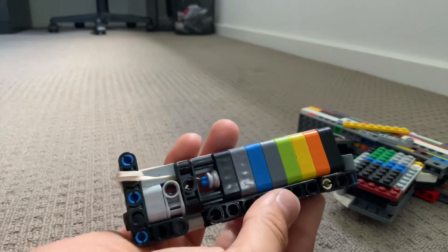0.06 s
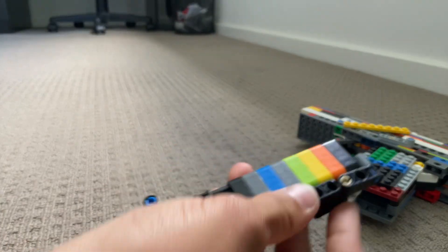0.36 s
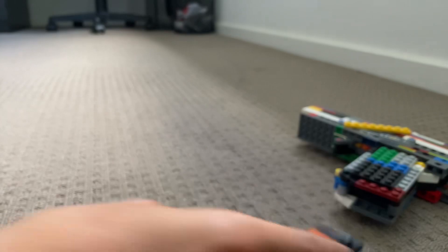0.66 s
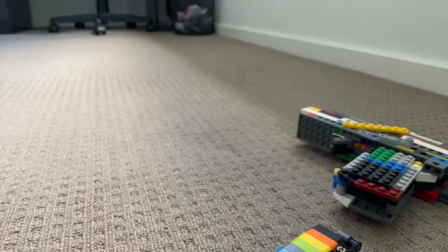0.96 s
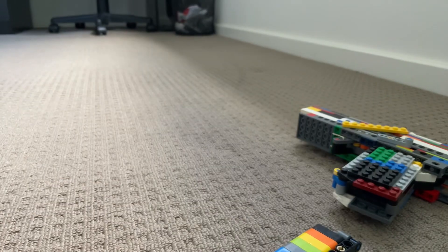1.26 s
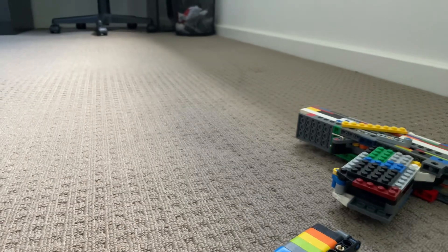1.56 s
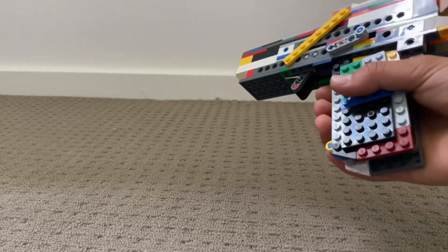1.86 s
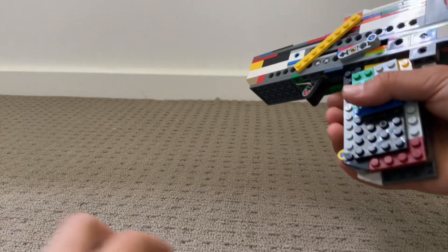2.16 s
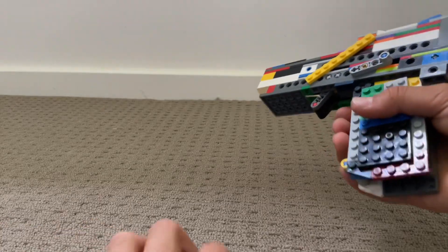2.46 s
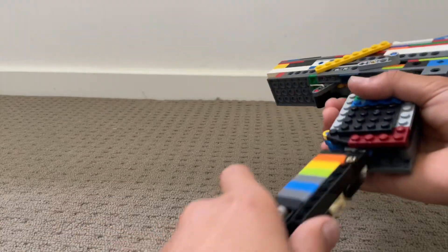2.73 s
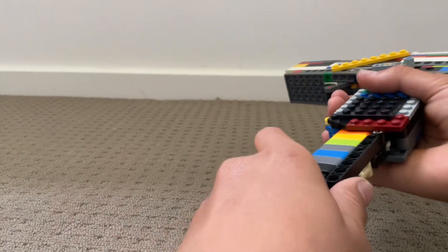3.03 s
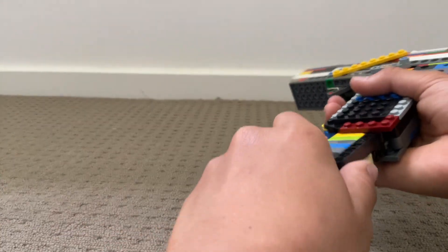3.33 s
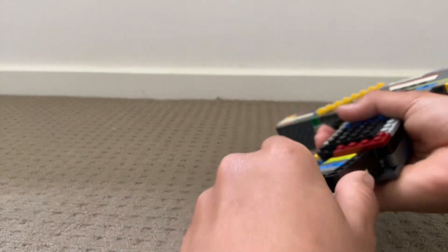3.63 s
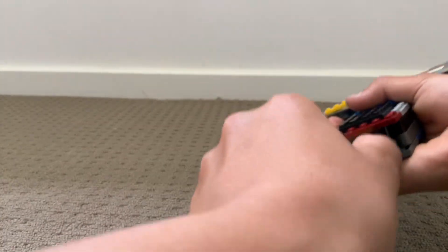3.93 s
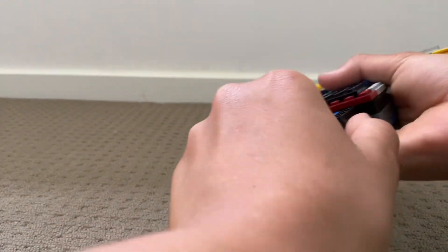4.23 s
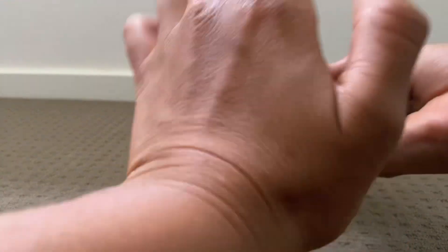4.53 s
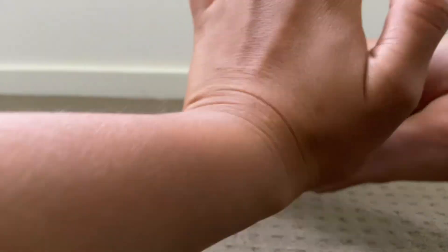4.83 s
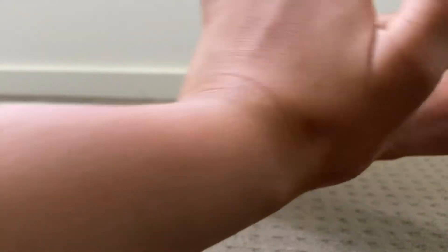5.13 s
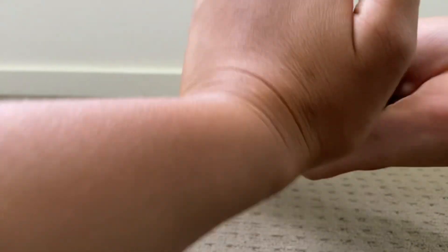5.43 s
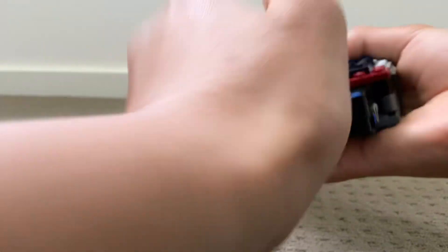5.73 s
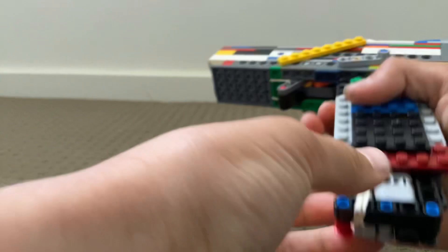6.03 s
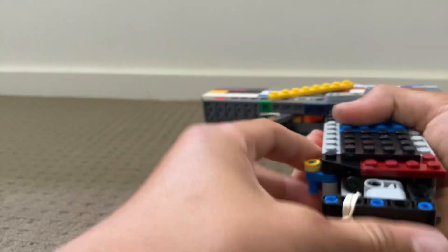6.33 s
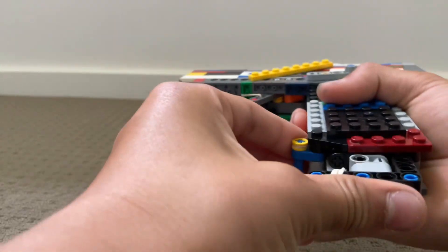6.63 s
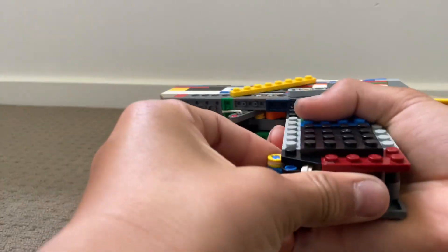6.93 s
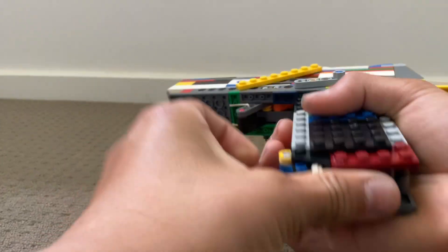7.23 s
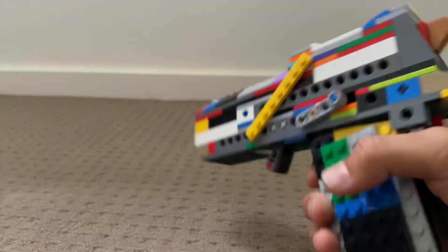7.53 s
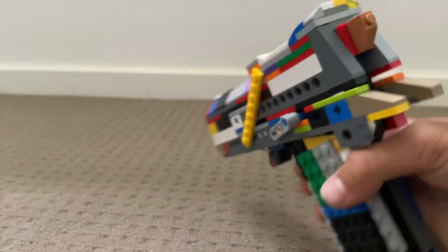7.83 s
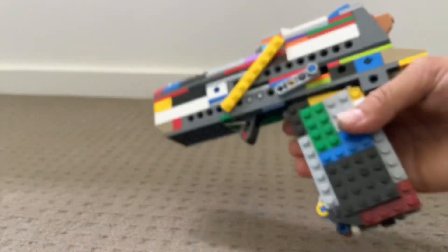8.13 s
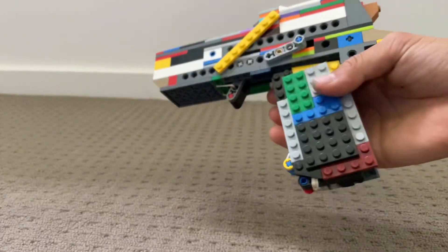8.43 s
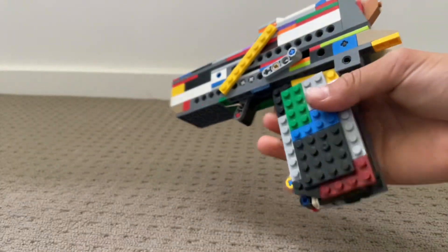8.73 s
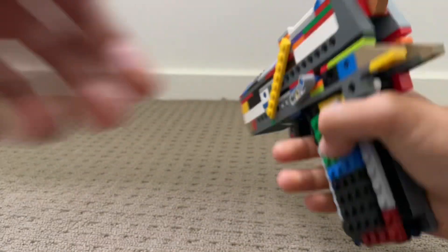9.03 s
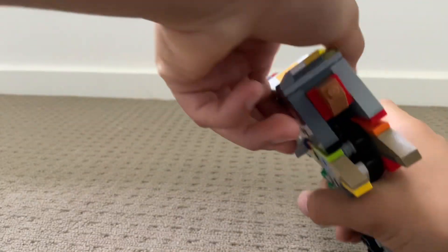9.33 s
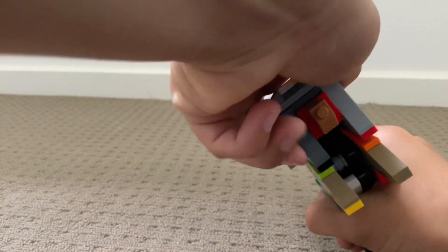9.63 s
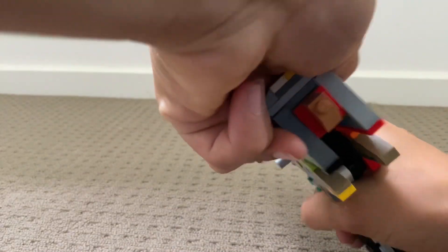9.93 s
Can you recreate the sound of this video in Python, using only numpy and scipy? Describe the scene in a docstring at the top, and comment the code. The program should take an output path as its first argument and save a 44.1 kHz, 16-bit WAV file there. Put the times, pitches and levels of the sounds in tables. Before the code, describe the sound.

A plastic piece clatters onto the floor, then hands push it into a brick toy gun with rattling clicks and a sharp snap.

```python
"""Faint, far chirps sound in a small, still room, then the magazine of a plastic-brick toy gun hits the floor.
Close by, just above the carpet, a hand picks it up, pushes it into the grip in rattling jerks and
snaps it home; then the slide is worked. Loose bricks click throughout, each a bright tick plus a
ring of the hollow toy. Studs scrape, joints creak and the floor knocks and thuds, while skin and
sleeves brush over plastic and carpet with a soft hiss."""
import sys
import numpy as np
from scipy import signal
from scipy.fft import rfft, irfft, next_fast_len
from scipy.io import wavfile

SR = 44100
rng = np.random.default_rng(int(sys.argv[2]) if len(sys.argv) > 2 else 0)


def transcribe(signal):
    """Save signal, clipped to [-1, 1], as a 16-bit WAV file at the path in sys.argv[1]."""
    frames = np.atleast_2d(signal).T
    limited = np.clip(frames, -1, 1)
    pcm = np.round(limited * 32767).astype(np.int16)
    wavfile.write(sys.argv[1], SR, pcm)


N = 439677
TIME = np.arange(N) / SR


def from_db(db):
    """Turn decibels into a number to multiply a sound by."""
    return np.exp(np.asarray(db) * (np.log(10) / 20))


def rms_one(x):
    """Scale a sound so that its average size (rms) is 1."""
    return x / np.sqrt(np.mean(x ** 2) + 1e-20)


def add(out, s, sound):
    """Mix a sound in at s seconds."""
    i = int(np.clip(s * SR, 0, N - 1))
    out[i:i + len(sound)] += sound[:N - i]


def band(x, low_hz, high_hz, order=2):
    """Keep the part of a sound between two frequencies."""
    edges = np.clip([low_hz, high_hz], 15, .47 * SR)
    return signal.sosfilt(signal.butter(order, edges, "band", fs=SR, output="sos"), x)


def coloured(x, spectrum):
    """Shape the lows and highs of a sound with a table of f/Hz, level/dB; the result has rms 1."""
    hz, db = np.transpose(spectrum)
    size = next_fast_len(N)
    bin_hz = np.maximum(np.arange(size // 2 + 1) * SR / size, 1)
    gain = from_db(np.interp(np.log(bin_hz), np.log(hz), db))
    return rms_one(irfft(rfft(x, size) * gain, size)[:N])


def dying(t, t60):
    """A fade that loses 60 dB every t60 seconds."""
    return from_db(-60 * t / t60)


def flutter(per_s):
    """A random wobble of rms 1 that glides to per_s new values a second."""
    knots = rng.standard_normal(int(per_s * N / SR) + 2)
    return rms_one(np.interp(TIME * per_s, np.arange(len(knots)), knots))


def swells(rows, width):
    """Bands of noise that fade in and out; width is a share of each band's centre frequency."""
    out = np.zeros(N)
    for start, end, db, hz in rows:
        count = max(int((end - start) * SR), 64)
        noise = band(rng.standard_normal(SR), hz * (1 - width / 2), hz * (1 + width / 2))[:count]
        add(out, start, from_db(db) * rms_one(noise) * signal.windows.tukey(len(noise), .5))
    return out


# the tone of still air: f/Hz, level/dB
AIR_COLOUR = [(29, -19.5), (50, -2.5), (277, -4.5), (572, -17.5), (765, -26), (863, -20), (1210, -21.5),
              (1580, -27.5), (2210, -25.5), (2490, -31.5), (3500, -35), (5810, -38), (6390, -32.5),
              (9870, -20.5), (16000, -35.5)]
def room_tone(air_db=-61, drone_db=-67, drone_band_hz=(265, 335), waver_db=3.1):
    """Still air, with a low room resonance that wavers a little."""
    drone = rms_one(band(rng.standard_normal(N), *drone_band_hz, order=1))
    air = from_db(air_db) * coloured(rng.standard_normal(N), AIR_COLOUR)
    return air + from_db(drone_db + waver_db * flutter(6.7)) * drone


# spells of humming: start t/s, end t/s, level/dB, centre f/Hz
HUMS = [(.83, 1.03, -55.5, 687), (1.12, 1.72, -58, 646)]
def hum():
    """A faint, hollow hum: noise so narrow that it sounds like a wavering note."""
    return swells(HUMS, width=.14)


# faint, far chirps: start t/s, first f/Hz, last f/Hz, level/dB
FAR_CHIRPS = [(.05, 2920, 2830, -56.5), (.094, 2680, 2200, -45.5), (1.29, 2520, 2340, -63)]
def chirps(attack_s=.0087, fall_s=.022, t60=.28):
    """Thin whistles that drop quickly in pitch, settle and fade."""
    out, t = np.zeros(N), TIME[:SR // 3]
    for s, first_hz, last_hz, db in FAR_CHIRPS:
        hz = last_hz + (first_hz - last_hz) * np.exp(-t / fall_s)
        level = from_db(db) * (1 - np.exp(-t / attack_s)) * dying(t, t60)
        add(out, s, level * np.sin(2 * np.pi * np.cumsum(hz) / SR))
    return out


# how much of the toy's sound comes by way of the walls, more while a hand screens it: t/s, level/dB
WALL_SHARE = [(.7, -9), (2.8, -13), (4.1, -6), (4.8, -11), (5.45, -10.5), (6.2, -19), (6.8, -12.5),
              (7.9, -14), (9.8, -15)]
def room(toy, far, first_echo_s=.0014, echoes_per_s=600, early_t60=.049, tail_t60=.29, treble_t60=.22):
    """The walls return a few echoes, then a smooth tail that dies sooner in the treble."""
    share_db = np.interp(TIME, *np.transpose(WALL_SHARE))
    t = TIME[:SR // 2]
    low, middle, high = rng.standard_normal((3, len(t)))
    tail = (from_db(-3) * band(low, 86, 1200) + band(middle, 1100, 6300)) * dying(t, tail_t60)
    tail += from_db(-1) * band(high, 4700, 17000) * dying(t, treble_t60)
    echoes = rms_one(rng.standard_normal(len(t)) * (rng.random(len(t)) < echoes_per_s / SR))
    response = (tail + echoes * dying(t, early_t60)) * (t > first_echo_s)
    response /= np.sqrt(np.sum(response ** 2))
    return signal.fftconvolve(toy * from_db(share_db) + far, response)[:N]


# moves of an arm: start t/s, end t/s, level/dB, centre f/Hz
ARM_MOVES = [(.609, 0.68, -36, 252), (.707, 0.827, -35, 227), (2.275, 2.528, -52.5, 604),
             (2.56, 2.742, -48.5, 284), (5.074, 5.397, -58, 336), (5.928, 6.031, -56.5, 504)]
def carpet_scuffs():
    """An arm shifts on the carpet and rubs out a low, broad noise."""
    return swells(ARM_MOVES, width=.9)


def skin_friction(ridges_per_s=900, ridge_db=-5, echo_s=.000703, wander=.22, echo_db=-6):
    """Smooth rubbing plus ticks of skin ridges; an echo off the toy shifts as the finger moves."""
    ridges = rms_one(rng.standard_normal(N) * (rng.random(N) < ridges_per_s / SR))
    rub = rng.standard_normal(N) + from_db(ridge_db) * ridges
    delay_s = echo_s * np.exp(wander * flutter(6))
    return rub + from_db(echo_db) * np.interp(TIME - delay_s, TIME, rub)


# the tone of brushing: f/Hz, level/dB
STROKE_COLOUR = [(410, -39), (700, 5), (757, -14), (934, -16.5), (1820, -18), (4050, -12), (5400, -2),
                 (7010, 3.5), (10500, -13), (12300, -11), (16000, -20)]
# strokes of skin and sleeve over the toy: fastest t/s, swell and fade t/s, level/dB, centre f/Hz
STROKES = [(.525, 0.052, -57, 3070), (0.908, 0.12, -47, 3240), (1.3, 0.32, -59, 3500),
           (2.06, 0.13, -49.5, 5340), (2.37, .13, -52, 3400), (2.88, 0.16, -62.5, 2500),
           (3.2, 0.11, -53.5, 2330), (3.55, 0.3, -63, 1350), (5.802, 0.081, -50.5, 4230),
           (6.0, 0.21, -55.5, 2450), (6.27, 0.062, -54, 2000), (6.461, 0.079, -54.5, 2500),
           (7.58, 0.19, -48.5, 2700), (7.8, .075, -52, 2900), (8.06, 0.12, -54.5, 1382),
           (8.569, 0.025, -52.5, 1970), (8.821, 0.044, -52.5, 2940), (9.0, .055, -52.5, 3000),
           (9.332, 0.034, -60, 2980), (9.52, 0.2, -56.5, 1600)]
def brushing(grain_db=1.5, waver_db=1.77, firm_db=-48, soft_offset_db=-6, soft_growth=1.93, focus_db=3):
    """Sliding skin makes a grainy hiss; each stroke swells, shifts in tone and fades."""
    fastest, swell, bright_db, rub_hz = np.transpose(STROKES)
    coarse_time = TIME[::100]
    speed = np.exp(-np.minimum(((coarse_time - fastest[:, None]) / swell[:, None]) ** 2, 50))
    stroked = lambda db: np.interp(TIME, coarse_time, from_db(db) @ speed)
    # a softer hiss lies around the bright one and gains soft_growth dB for each dB of the stroke
    soft_db = firm_db + soft_offset_db + soft_growth * (bright_db - firm_db)
    grain = from_db(grain_db * flutter(350) + waver_db * flutter(45))
    hiss = [coloured(skin_friction(), STROKE_COLOUR) * grain for _ in range(2)]
    out = stroked(bright_db) * rms_one(band(hiss[0], 9200, 12200, order=3))
    out += stroked(soft_db) * rms_one(band(hiss[1], 12000, 17000))
    edges_hz = np.geomspace(850, 7500, num=8)
    for k, (low, high) in enumerate(zip(edges_hz, edges_hz[1:])):
        octaves_off = np.log2(np.sqrt(low * high) / rub_hz)
        level = stroked(soft_db - focus_db * octaves_off ** 2)
        out += level * from_db(flutter(14)) * rms_one(band(hiss[k % 2], low, high))
    return out


# the hand squeezes the toy: start t/s, end t/s, faintest slip level/dB
SQUEEZES = [(2.851, 4.505, -51), (4.992, 5.9, -54.5), (5.9, 6.551, -47), (7.251, 8.148, -47.5),
            (8.945, 9.656, -48.5)]
def creaks(slips=24, slip_t60=.014, range_db=18, joints=4, pitch_range_hz=(1200, 2800), edge_db=-9):
    """Squeezed joints slip: mostly faint ticks, each on one of a few pitches, with a bright edge."""
    bursts, t = np.zeros((joints, N)), TIME[:SR // 50]
    for start, end, db in SQUEEZES:
        for late, force, joint in rng.random((slips, 3)):
            slip = from_db(db + range_db * force ** 3) * rng.standard_normal(len(t)) * dying(t, slip_t60)
            add(bursts[int(joint * joints)], start + late * (end - start), slip)
    bursts += 1e-12 * np.cos(np.pi * TIME * SR / 2)  # too small to hear; keeps the filters fast
    pitches = np.geomspace(*pitch_range_hz, num=joints)
    body = sum(band(x, hz * .7, hz * 1.4, order=1) for x, hz in zip(bursts, pitches))
    return body + from_db(edge_db) * band(bursts.sum(axis=0), 8000, 13000)


def finger_rumble(db=-65, band_hz=(230, 620), lumpy_db=5, fade_s=.11):
    """During the same squeezes, shifting fingers draw a dull, lumpy rumble from the toy."""
    held = sum(np.clip(np.minimum(TIME - start, end - TIME) / fade_s + .5, 0, 1)
               for start, end, _ in SQUEEZES)
    return from_db(db + lumpy_db * flutter(31)) * held * rms_one(band(rng.standard_normal(N), *band_hz))


# a tight joint rubbing: start t/s, end t/s, level/dB, centre f/Hz
TIGHT_JOINT = [(6.17, 6.39, -61, 1367)]
def squeak():
    """A tight joint creaks on one thin note as the magazine seats."""
    return swells(TIGHT_JOINT, width=.025)


# the notes the floor rings at: f/Hz, level/dB, 60 dB fade t/s
FLOOR_NOTES = [(172, 1.5, 0.11), (300, -4, .13), (341, -3, 0.45), (426, -3.5, 0.54), (554, 1, 0.084)]
# blows that travel through the floor: t/s, knock level/dB, thud level/dB, thud f/Hz
FLOOR_HITS = [(0.6052, -20.5, -24, 159), (0.6236, -19, -26.5, 159), (0.708, -20.5, -24, 129),
              (0.7191, -16, -27, 120), (0.782, -29, -53, 192), (2.462, -37, -61, 145),
              (2.4943, -32, -45, 150), (4.198, -36.5, -39.5, 113), (4.768, -34.5, -35, 76),
              (4.925, -45.5, -38, 60), (5.427, -35, -36.5, 90), (6.766, -37.5, -21, 97.7),
              (6.804, -40.5, -25, 85.7), (7.363, -51, -38, 108)]
def floor_blows(first_hz=842, lowest_hz=190, fall_s=.0042, knock_t60=.045, rise_s=.00071,
                boards_db=-23, thud_lag_s=.01, thud_t60=.054):
    """Waves cross the floor treble first, so a knock falls in pitch; the floor rings, a thud follows."""
    out, t = np.zeros(N), TIME[:SR // 4]
    onset = 1 - np.exp(-(t / rise_s) ** 2)
    note_hz, note_db, note_t60 = np.transpose(FLOOR_NOTES)
    for s, knock_db, thud_db, thud_hz in FLOOR_HITS:
        hz = lowest_hz + (first_hz - lowest_hz) / (1 + t / fall_s) ** 2
        knock = 2 * dying(t, knock_t60) * np.sin(2 * np.pi * np.cumsum(hz) / SR)
        boards = ring(t, note_hz, from_db(note_db + boards_db), note_t60)
        thud = dying(t, thud_t60) * np.sin(2 * np.pi * thud_hz * t)
        add(out, s, from_db(knock_db) * onset * (knock + boards))
        add(out, s + thud_lag_s, from_db(thud_db) * onset * thud)
    return out


def ring(t, hz, gains, t60):
    """A struck object rings at several fading notes, each with a random strength and sign."""
    strength = gains * rng.choice([-1, 1], len(hz)) * from_db(rng.normal(0, 3, len(hz)))
    return strength @ (np.sin(2 * np.pi * hz[:, None] * t) * dying(t, t60[:, None]))


# the tone of scraping plastic: f/Hz, level/dB
PLASTIC_COLOUR = [(240, -49), (400, -10.5), (489, -10), (708, -12.5), (1040, -2.5), (1180, -9.5),
                  (1790, -4.5), (6540, -14), (9470, 1.5), (12100, -11), (16000, -28.5)]
# parts are shoved along each other in jerks: start t/s, end t/s, level/dB
SHOVES = [(2.444, 2.487, -46), (4.12, 4.208, -38), (4.664, 4.71, -45.5), (4.715, 4.779, -35.5),
          (5.417, 5.475, -35), (6.757, 6.818, -30), (9.946, 9.982, -48)]
def scrapes(catches_per_s=4000, spread_db=1.5, attack_s=.0076, release_t60=.069):
    """Studs and seams catch and slip: a dense run of tiny uneven clicks."""
    sizes = from_db(spread_db * np.minimum(rng.exponential(1, N), 3)) * rng.standard_normal(N)
    grains = coloured(sizes * (rng.random(N) < catches_per_s / SR), PLASTIC_COLOUR)
    push = np.zeros(N)
    for start, end, db in SHOVES:
        rise = np.clip((TIME - start) / attack_s, 0, 1)
        push += from_db(db) * rise * dying(np.clip(TIME - end, 0, 1), release_t60)
    return push * grains


def stud_catches(count=4, ring_hz=2280, shell_offset_db=-1, tick_offset_db=7.5):
    """Studs catch at uneven steps through each shove; gives extra rows for BRICK_HITS."""
    rows = []
    for start, end, db in SHOVES:
        times = start + (end - start) * (np.arange(count) + rng.random(count)) / count
        for s, (shell_db, tick_db) in zip(times, db + rng.standard_normal((count, 2))):
            rows.append((s, ring_hz, shell_db + shell_offset_db, tick_db + tick_offset_db))
    return rows


# the notes of the toy's hollow shell: f/Hz, level/dB
SHELL_NOTES = [(645, -10.5), (775, -9), (1076, -7.5), (1248, -2.5), (1421, -6), (1550, 0), (1744, 0.5),
               (1981, -6), (2110, 0), (2411, 1), (2562, -1), (2756, -0.5), (3014, -2.5), (3165, 0),
               (3316, -4.5), (3466, 0.5), (3596, 3), (3768, -15)]
# brick meets brick: t/s, centre of the shell's ring f/Hz, shell level/dB, bright tick level/dB
BRICK_HITS = [(0.6052, 1090, -38.5, -31), (0.623, 900, -33, -21.5), (0.6278, 905, -26.5, -20),
              (0.7217, 890, -26, -16), (0.7842, 1096, -38.5, -34.5), (2.4653, 1030, -41.5, -28),
              (2.4944, 1000, -34, -41), (2.5725, 1700, -58.5, -35.5), (2.7693, 1920, -33, -24.5),
              (2.8499, 2290, -32, -28), (2.9136, 3150, -28, -28.5), (2.9701, 1550, -38, -35),
              (2.983, 1530, -39, -47), (3.335, 1890, -31.5, -27), (3.47, 1450, -44.5, -67),
              (3.6469, 1500, -40, -44.5), (3.697, 1640, -39.5, -59), (3.8294, 2500, -40, -35.5),
              (3.9669, 1300, -70, -37), (4.0624, 1340, -43.5, -47), (4.1155, 2240, -30.5, -21.5),
              (4.121, 2040, -26, -18), (4.1948, 1730, -32.5, -26.5), (4.374, 1780, -46, -42.5),
              (4.406, 1790, -53, -44), (4.701, 2300, -33, -24.5), (4.7122, 2150, -21.5, -17),
              (4.7393, 2610, -19.5, -14), (4.7498, 2400, -20, -14.5), (4.7671, 2380, -16.5, -12),
              (4.8765, 1280, -41.5, -36), (4.9341, 1930, -35.5, -40), (4.9593, 1890, -40, -46.5),
              (5.4273, 2630, -24.5, -18.5), (5.4543, 2500, -31.5, -21), (5.595, 1930, -60, -46),
              (5.6712, 2070, -46, -28.5), (5.841, 2060, -43, -39.5), (6.1473, 1910, -48, -52),
              (6.1992, 2140, -42, -24.5), (6.429, 2400, -44, -43), (6.444, 2660, -35.5, -30.5),
              (6.4998, 2400, -45, -36), (6.7632, 2100, -15, -12), (6.7708, 2270, -25.5, -22),
              (6.784, 2240, -16.5, -17.5), (6.7881, 1620, -18.5, -13.5), (6.7966, 2120, -25.5, -15.5),
              (7.0994, 1785, -40, -45.5), (7.2954, 1580, -43, -46), (7.404, 2360, -40.5, -27),
              (7.557, 2280, -40, -38.5), (7.684, 2360, -36, -24), (7.9274, 2270, -30, -17.5),
              (8.079, 2460, -39, -39.5), (8.1393, 1620, -44, -40.5), (9.161, 2000, -40.5, -31),
              (9.468, 2020, -46, -71), (9.6631, 1900, -36, -38.5), (9.7611, 2730, -41, -16.5),
              (9.7892, 3420, -45, -31), (9.8538, 1710, -21, -18), (9.8576, 2290, -53, -15),
              (9.9131, 2080, -34, -41)]
def brick_clicks(shell_t60=.021, focus_octaves=.65, grit_db=-6, hollow_db=-20, press_s=.000083,
                 tick_hz=10200, tick_width=.21, tick_t60=.015, crack_t60=.019, scatter_t60=.048):
    """Each hit rings the hollow shell and the small stiff bricks; gives close and wall-bound sound."""
    near, to_walls, t = np.zeros(N), np.zeros(N), TIME[:SR // 25]
    note_hz, note_db = np.transpose(SHELL_NOTES)
    note_t60 = shell_t60 * np.sqrt(np.median(note_hz) / note_hz)  # high notes die sooner
    same_energy = lambda x: x / np.sqrt(np.sum(x ** 2) / (.005 * SR))  # that of 5 ms at rms 1
    press = 1 - np.exp(-t / press_s)

    def burst(band_hz, t60):
        """Notes too close together to tell apart: a dying band of noise."""
        return same_energy(band(rng.standard_normal(len(t)) * press * dying(t, t60), *band_hz))

    for s, centre_hz, shell_db, tick_db in BRICK_HITS + stud_catches():
        # the spot that is hit favours one group of the shell's notes
        favour = np.exp(-.5 * (np.log2(note_hz / centre_hz) / focus_octaves) ** 2)
        shell = same_energy(press * ring(t, note_hz, from_db(note_db) * favour, note_t60))
        size_octaves = .12 * rng.uniform(-1.1, 1)  # bricks of different sizes tick at different pitches
        glance_octaves = .015 * max(tick_db - shell_db - 12, 0)  # a glancing hit ticks higher
        brick_hz = tick_hz * 2 ** (size_octaves + glance_octaves)
        tick_band = (brick_hz * (1 - tick_width), brick_hz * (1 + tick_width))
        shell_band, crack_band = (centre_hz * .49, centre_hz * 1.243), (3300, 6800)
        crack_db = (shell_db + tick_db) / 2 - 8.5  # a crack fills the gap between ring and tick
        grit = from_db(grit_db) * burst(shell_band, shell_t60)
        hollow = from_db(hollow_db) * burst((480, 780), shell_t60)
        body = from_db(shell_db) * band(shell + grit + hollow, 300, 4300)
        crack = from_db(crack_db) * burst(crack_band, crack_t60)
        tick = from_db(tick_db) * burst(tick_band, tick_t60)
        add(near, s, body + crack + tick)
        # each direction gets different notes, so the walls receive a smooth blend
        for db, band_hz in (shell_db, shell_band), (crack_db, crack_band), (tick_db, tick_band):
            add(to_walls, s, from_db(db) * burst(band_hz, scatter_t60))
    return near, to_walls


def scene(floor_to_walls_db=-4):
    """Toy, hands and floor in the room; the chirps are heard only by way of the walls."""
    clicks, clicks_to_walls = brick_clicks()
    friction, blows = scrapes() + creaks(), floor_blows()
    walls = room(clicks_to_walls + friction + from_db(floor_to_walls_db) * blows, chirps())
    hands = brushing() + finger_rumble() + carpet_scuffs()
    return (clicks + friction + blows + walls + hands + squeak() + hum() + room_tone())[None]


def record(dry, low_cut_hz=50, high_cut_hz=16000, ceiling=.95):
    """The deep bass is cut, the sound drops out for an instant, peaks are rounded and the top is cut."""
    dry = signal.sosfilt(signal.butter(3, low_cut_hz, "high", fs=SR, output="sos"), dry)
    dropout = np.interp(TIME, [1.638, 1.64, 1.672, 1.71], [1, 0, 0, 1])
    rounded = ceiling * np.tanh(dry * dropout / ceiling)
    return signal.sosfilt(signal.ellip(10, .3, 90, high_cut_hz, fs=SR, output="sos"), rounded)


dry = scene()
out = record(dry)
transcribe(out)
```